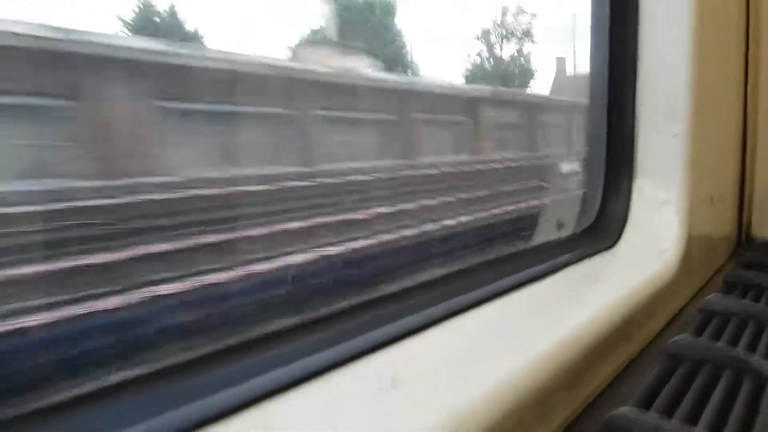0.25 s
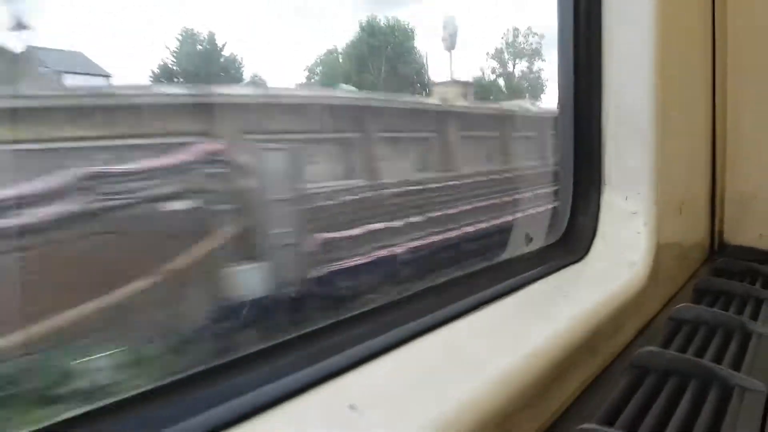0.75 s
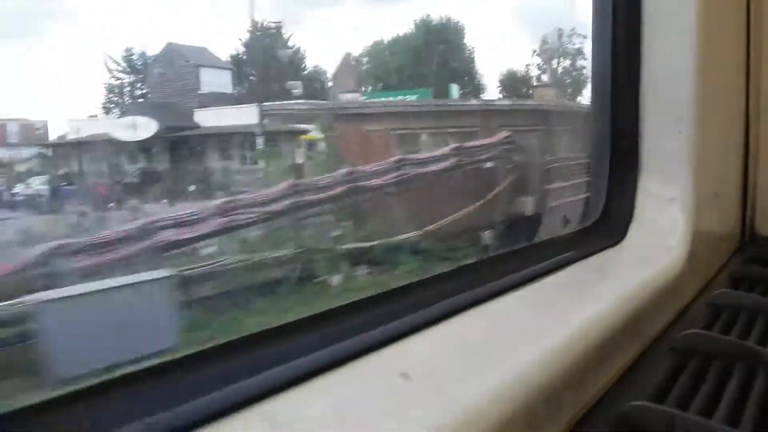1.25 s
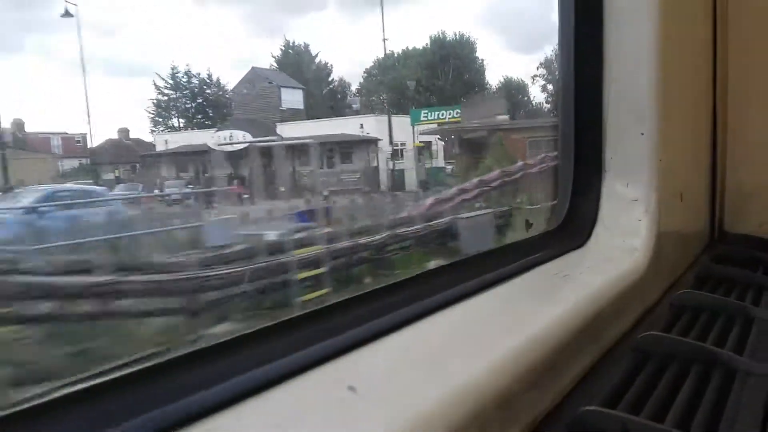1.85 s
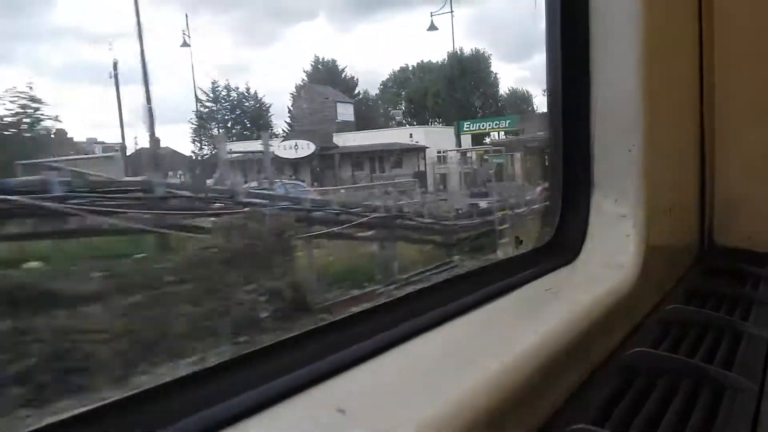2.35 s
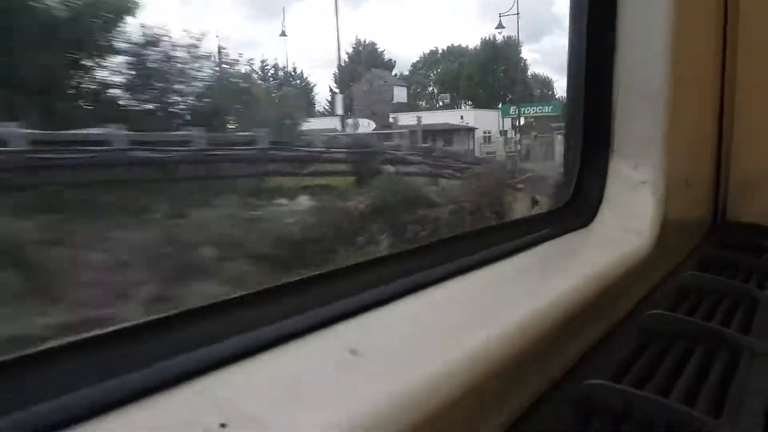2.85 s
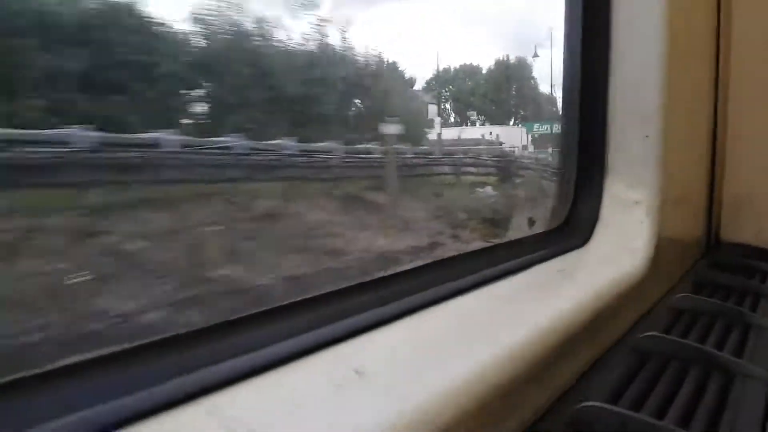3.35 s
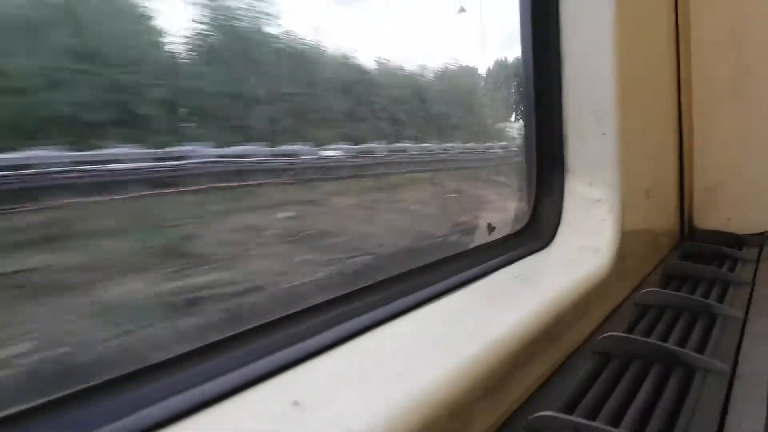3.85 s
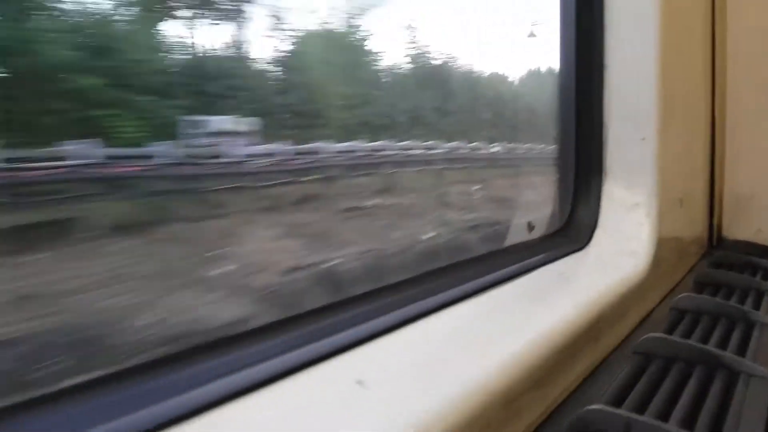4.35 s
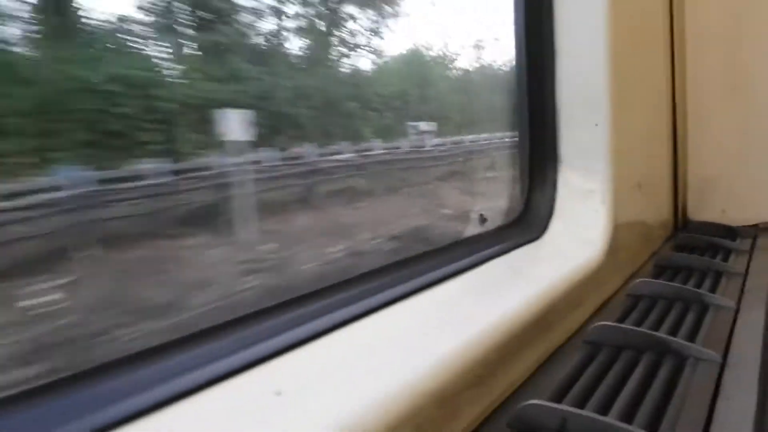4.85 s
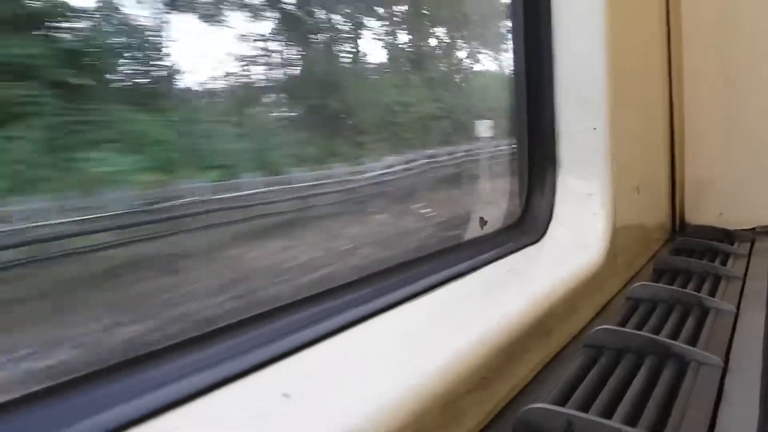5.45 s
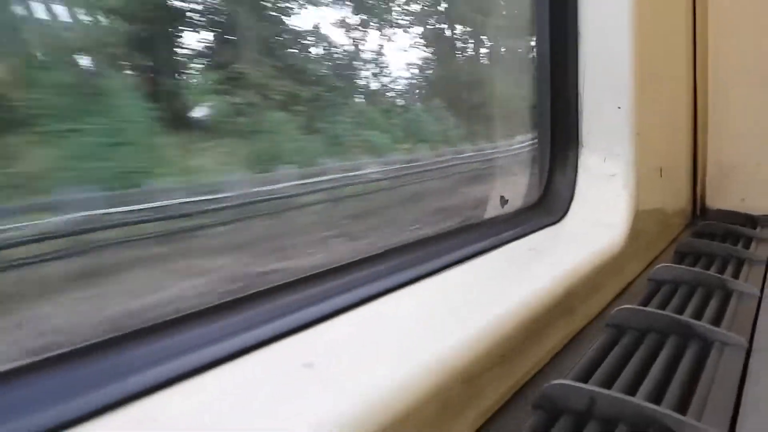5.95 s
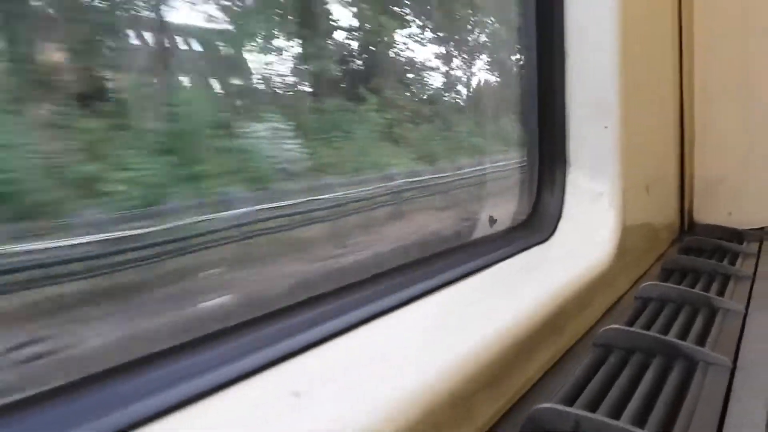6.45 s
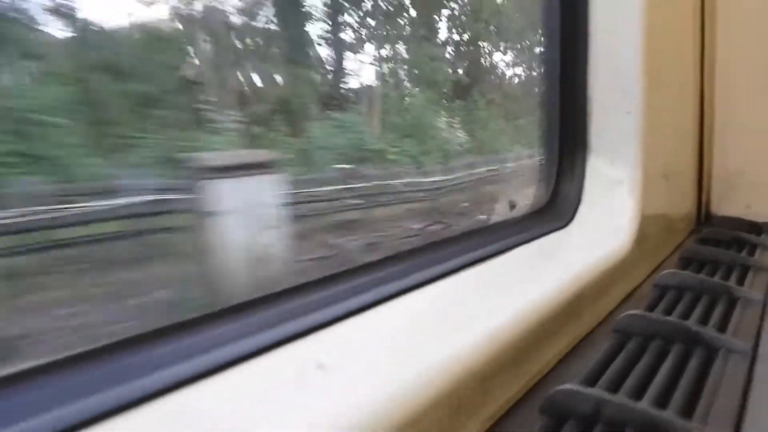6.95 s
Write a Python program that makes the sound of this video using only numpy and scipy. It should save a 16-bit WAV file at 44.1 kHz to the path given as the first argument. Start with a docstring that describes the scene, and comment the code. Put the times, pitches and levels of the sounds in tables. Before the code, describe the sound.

Interior of an underground train accelerating gently on open track, heard in stereo from a window seat. Throughout, deep rumble and wheel roar come through the floor, with muffled tread hiss, faintly ringing rims and gear and motor tones creeping upward. From 0.2 s, irregular thumps and loose clatter come several times a second, with brief flange rubs at 0.3-0.4 s and a faint low drone around 1.2-1.8 s. Between 2.2 and 3.5 s, dry shoe scrapes appear, sharpest near 2.6 s with a squeak and bright hiss; hard clacks fall around 2.9-3.0 s. From 4.0 to 5.2 s, strong low drones near 210 Hz pulse and beat with gritty grinding and heavier rumble. After 5.3 s it calms; a rough gearcase howl grows, turning cleaner after 6.4 s. Sharp clacks and a heavy thump land around 6.6-6.9 s, before the rolling sound continues to about 7.2 s.

```python
"""Underground train gathering speed

A carriage on open track, heard from a window seat. Motor and gears whine upward as harmonics of the shaft.
Shaped noise makes the rumble and roar through the floor and the hiss of the treads; the rims ring faintly.
Rail joints set off decaying panel modes, and stretches of rippled rail add beating drones.
Wheel flanges rub in gritty bands of noise; the current shoes scrape and squeak, and bright hiss bursts out."""
import sys
import numpy as np
from scipy import signal
from scipy.fft import rfft, irfft
from scipy.io import wavfile
from scipy.ndimage import uniform_filter1d, map_coordinates

SR = 44100
rng = np.random.default_rng(int(sys.argv[2]) if len(sys.argv) > 2 else 0)


def to_wav(s):
    """Save 16-bit WAV."""
    ch = np.atleast_2d(s).T  # columns
    pcm = np.round(np.clip(ch, -1, 1) * 32767)  # PCM
    wavfile.write(sys.argv[1], SR, pcm.astype(np.int16))


N = 317950
TIME = np.arange(N) / SR  # s
FREQ = np.arange(N // 2 + 1) * SR / N  # Hz


def undb(db):
    """Logarithmic level: decibels to amplitude gain."""
    return 10 ** (np.asarray(db) / 20)


def curves(table):
    """Linear interpolation: each column after the first as a line through time."""
    s, *columns = np.transpose(table)
    return [np.interp(TIME, s, column) for column in columns]


def colour(points):
    """Spectral envelope: levels in dB joined by straight lines on a log-frequency axis."""
    hz, db = np.transpose(points)
    return np.interp(np.log(FREQ + 1), np.log(hz), db)


def resonances(modes):
    """Resonance: the lift in dB that a set of modes gives, each a Lorentzian peak in power."""
    lift = 0
    for hz, width_hz, db in modes:
        peak = (undb(db) ** 2 - 1).clip(0)
        lift = lift + peak / (1 + (2 * (FREQ - hz) / width_hz) ** 2)
    return 10 * np.log10(1 + lift)


def unit(x):
    """Normalization: scale to rms 1."""
    return x / np.sqrt(np.mean(x ** 2))


def shape(x, db):
    """Linear filtering: weight the spectrum of x by a response in dB."""
    return irfft(rfft(x) * undb(db), N)


def noise(db):
    """Filtered noise: two unrelated channels (mid, side) with the given spectrum, rms 1."""
    return unit(shape(rng.standard_normal((2, N)), db))


def walk(rate):
    """Band-limited randomness: a smooth wander through `rate` random knots per second, rms 1."""
    knots = rng.standard_normal(4096)
    return unit(map_coordinates(knots, [TIME * rate], order=3, mode="wrap"))


def tone(hz, flutter_db, flutter_rate):
    """Multipath fading: a line whose strength flutters as its paths through the carriage shift; (mid, side)."""
    phase = 2 * np.pi * np.cumsum(hz) / SR
    channels = []
    for _ in range(2):
        strength = undb(flutter_db * np.tanh(walk(flutter_rate)))
        channels.append(strength * np.sin(phase + rng.uniform(0, 2 * np.pi)))
    return unit(np.array(channels))


def howl(hz, width_hz):
    """Quadrature modulation: a narrow band of noise riding on a pitch; (mid, side)."""
    phase = 2 * np.pi * np.cumsum(hz) / SR
    channels = [walk(width_hz) * np.sin(phase) + walk(width_hz) * np.cos(phase) for _ in range(2)]
    return unit(np.array(channels))


def swell(s, length):
    """Gaussian envelope: a smooth rise and fall around s, down to 1/e at `length` seconds either side."""
    return np.exp(-((TIME - s) / length) ** 2)


def swells(events):
    """Superposition: the summed gain of swells given as (middle, 1/e half-length, level in dB)."""
    return sum(undb(db) * swell(s, length) for s, length, db in events)


# Traction levels. Each row: time in seconds, gear mesh, motor whine and thin whistle in dB.
TRACTION_LEVELS = [(0, -45, -41, -74), (.5, -39, -51, -65.5), (1.1, -38.5, -52, -56),
                   (1.9, -38.5, -46.5, -56), (2.7, -36, -55.5, -65), (3.5, -33, -53, -58.5),
                   (4.8, -36, -59, -60.5), (5.6, -32.5, -50.5, -56), (6.3, -39.5, -49.5, -64),
                   (7.21, -36, -53, -63)]
# Gear tones. Each row: multiple of the shaft speed, relative level in dB before the frame resonance.
GEAR_PARTIALS = [(18, 0), (36.4, -15.5)]
# Motor whine tones. Each row: multiple of the shaft speed, relative level in dB.
WHINE_PARTIALS = [(51, -7), (64, 0)]
# Speed of the motor shaft. Each row: time in seconds, turns per second.
SHAFT_SPEED = [(0, 22.79), (1.15, 23.37), (5.3, 25.23), (6.0, 25.6), (7.21, 26.32)]
# Gearcase, rough at first, then settling on a clean note.
# Each row: time in seconds, rough howl and clean note in dB, both before the gearcase resonance.
GEARCASE_LEVELS = [(0, -52, -60), (3.6, -44, -49), (5.0, -41, -45), (5.5, -37.5, -47), (6.1, -36.5, -48),
                   (6.5, -40, -40.5), (7.21, -43.5, -36.5)]
WHISTLE_ORDER, CASE_ORDER = 192, 29.25  # multiples of the shaft speed


def traction():
    """Harmonic excitation: gear teeth and rotor slots sing at multiples of shaft speed; the gearcase howls."""
    gear_db, whine_db, whistle_db = curves(TRACTION_LEVELS)
    howl_db, note_db = curves(GEARCASE_LEVELS)
    shaft_hz = curves(SHAFT_SPEED)[0] * (1 + 0.0004 * walk(6))
    gear = sum(undb(db) * tone(order * shaft_hz, flutter_db=1.5, flutter_rate=8.6)
               for order, db in GEAR_PARTIALS)
    # the upper gear tone stands out while it passes a resonance of the bogie frame
    gear = shape(gear, resonances([(842, 8, 16)]))
    whine = sum(undb(db) * tone(order * shaft_hz, flutter_db=5.0, flutter_rate=10)
                for order, db in WHINE_PARTIALS)
    whistle = howl(WHISTLE_ORDER * shaft_hz, width_hz=24)
    # a rough tone with a clean core climbs into the fixed resonance of the gearcase
    case_hz = CASE_ORDER * shaft_hz
    rough = undb(howl_db) * howl(case_hz + 8, width_hz=80)
    clean = undb(note_db) * tone(case_hz, flutter_db=1, flutter_rate=12)
    case = shape(rough + clean, resonances([(765, 50, 5)]))
    return undb(gear_db) * gear + undb(whine_db) * whine + undb(whistle_db) * whistle + case


# Roughness of the track. Each row: time in seconds, then the driving levels in dB of the bogie boom,
# the floor rumble and the wheel roar, before each layer's own offset.
TRACK_ROUGHNESS = [(0.0, -25.5, -24, -27), (0.44, -34.5, -23.5, -28), (0.76, -31, -26.5, -29),
                   (0.98, -38.5, -31.5, -29), (1.65, -34, -27, -27), (2.55, -31, -34.5, -27.5),
                   (2.75, -29.5, -27, -26), (3.09, -40, -36.5, -28), (3.41, -25, -23.5, -26),
                   (3.73, -37.5, -32, -29.5), (4.18, -39.5, -21.5, -27), (4.84, -36.5, -38, -27.5),
                   (5.06, -36.5, -23.5, -27.5), (5.26, -33, -27.5, -28.5), (5.62, -37, -31.5, -32.5),
                   (6.57, -40, -37, -31.5), (6.77, -28, -28, -27.5), (7.21, -39.5, -28.5, -29)]
# Dips that rock the bogies.
# Each row: middle in seconds, 1/e half-length in seconds, boom in dB, rumble in dB.
TRACK_DIPS = [(0.095, 0.07, -37, -26.5), (0.556, 0.052, -26.5, -26), (1.608, 0.19, -46, -24.5),
              (2.168, 0.12, -26.5, -23), (2.761, 0.28, -28.5, -17.5), (3.357, 0.064, -27, -23.5),
              (4.028, 0.1, -29.5, -18), (4.482, 0.074, -40.5, -15), (4.641, 0.096, -44, -18.5),
              (4.997, 0.034, -37, -16), (5.167, 0.075, -25.5, -23.5), (5.399, 0.053, -24.5, -24),
              (5.865, 0.05, -27, -29), (5.985, 0.029, -30, -28.5), (6.138, 0.03, -33.5, -24.5),
              (6.279, .06, -30, -24.5), (6.582, 0.062, -31, -25.5), (6.804, 0.03, -30, -24.5),
              (6.985, .04, -34, -33)]
# Floor and wall panels. Each row: mode in Hz, width in Hz, lift in dB.
PANEL_MODES = [(59.3, 6.2, 8.5), (98.5, 9.8, 6.5), (142.3, 18, 10.5), (190.8, 22, 6), (234.2, 13, 5),
               (287.3, 27, 4.5), (369.5, 13, 1), (442, 39, 1.5)]
# Spectra before the panels: rocking bogies, floor rumble, wheel roar.
# Each row: frequency in Hz, relative level in dB per Hz.
BOOM_SPECTRUM = [(20, -61.5), (30, -25), (42, -8.5), (56, 1.5), (75, 6), (100, 8.5), (125, -3),
                 (200, -50.5)]
RUMBLE_SPECTRUM = [(50, -34), (90, -18.5), (120, -6), (150, -1), (220, 0.5), (270, -18.5), (400, -16.5),
                   (900, -71)]
ROAR_SPECTRUM = [(120, -15.5), (220, -3.5), (290, 1), (370, -1.5), (450, -4), (560, -5), (700, -4.5),
                 (840, -7.5), (1000, -14), (1300, -21), (2000, -28), (4000, -32.5), (9000, -61)]
BOOM_DB, RUMBLE_DB, ROAR_DB = 1, 1.5, 5  # offset of each layer from the track level that drives it


def rolling():
    """Forced vibration: rail roughness rocks bogies, shakes panels and roars below; dips add low surges."""
    boom_db, rumble_db, roar_db = curves(TRACK_ROUGHNESS)
    panels = resonances(PANEL_MODES)
    rock = swells((s, length, db) for s, length, db, _ in TRACK_DIPS)
    shake = swells((s, length, db) for s, length, _, db in TRACK_DIPS)
    # track and dips add in power
    boom_gain = np.hypot(undb(boom_db + BOOM_DB), rock)
    rumble_gain = np.hypot(undb(rumble_db + RUMBLE_DB + 1.5 * walk(20)), shake)
    roar_gain = undb(roar_db + ROAR_DB + 1.25 * walk(25))
    boom = boom_gain * noise(colour(BOOM_SPECTRUM) + panels)
    rumble = rumble_gain * noise(colour(RUMBLE_SPECTRUM) + panels)
    roar = roar_gain * noise(colour(ROAR_SPECTRUM) + panels)
    return boom + rumble + roar


# Steel tread grinding on the rail. Each row: frequency in Hz, relative level in dB per Hz.
GRIND_SPECTRUM = [(400, -0.5), (700, 2.5), (1000, 0), (1400, -5.5), (2200, -13), (2700, -29.5),
                  (4000, -23.5), (9000, -54)]


def grinding():
    """Rough contact: the gritty sound of a steel tread on the rail, as noise of flickering level."""
    return noise(colour(GRIND_SPECTRUM)) * undb(2.1 * walk(60))


# Wheel on rail. Each row: time in seconds, hiss in dB, rim singing in dB.
TREAD_LEVELS = [(0, -35.5, -56), (.4, -34.5, -51), (.8, -38.5, -55.5), (2.2, -39, -51), (3.3, -37.5, -48),
                (3.75, -39.5, -51.5), (4.6, -38, -68), (5.8, -39.5, -51), (6.2, -37, -46.5),
                (7.21, -37.5, -52.5)]
# Tread hiss before the rims colour it. Each row: frequency in Hz, relative level in dB per Hz.
HISS_SPECTRUM = [(600, -10), (1300, 9.5), (1900, 3), (2600, 1), (3600, 1.5), (4400, -0.5), (5100, -3.5),
                 (5600, -6.5), (6800, -14), (8000, -13.5), (9000, -56.5)]
# Rims that colour the hiss. Each row: mode in Hz, width in Hz, lift in dB.
RIM_MODES = [(2310, 180, 9.5), (3030, 220, 6.5), (3130, 180, 5.5), (3943, 78, 8), (4930, 200, 7)]
# Singing rims. Each row: tone in Hz, width in Hz, relative level in dB.
SINGING_TONES = [(2252, 50, -2), (2995, 20, -4), (3116, 45, -2), (3985, 38, -9)]
GRIND_DB = -11  # offset of the grinding from the roar level of the track


def wheels():
    """Modal response: treads hiss, and grind harder on rough track; the rims colour the hiss and sing."""
    hiss_db, sing_db = curves(TREAD_LEVELS)
    *_, roar_db = curves(TRACK_ROUGHNESS)
    hiss = noise(colour(HISS_SPECTRUM) + resonances(RIM_MODES)) * undb(hiss_db + 0.73 * walk(20))
    sing = sum(undb(db) * howl(np.full(N, hz), width_hz) for hz, width_hz, db in SINGING_TONES)
    return hiss + undb(roar_db + GRIND_DB) * grinding() + undb(sing_db) * sing


# Blows at the rail joints. Each row: start in seconds, thump in dB, clatter in dB before its envelope,
# contact frequency in Hz (higher for a brighter thump).
JOINT_BLOWS = [(.217, -13.5, -24.5, 176.5), (0.247, -23.5, -19.5, 230), (.374, -19.5, -17, 288),
               (.516, -20.5, -32, 194), (.650, -19.5, -21, 212), (.720, -20.5, -28.5, 258),
               (.912, -16.5, -35, 202), (1.244, -15.5, -16.5, 226), (1.385, -15, -21, 224),
               (1.494, -19.5, -37.5, 256), (1.656, -21, -31.5, 212), (1.804, -22, -23.5, 235),
               (1.946, -22.5, -32.5, 296), (2.063, -17, -25, 297), (2.160, -20.5, -18.5, 315),
               (2.296, -16, -16, 328), (2.512, -17.5, -24.5, 374), (2.629, -15, -28.5, 322),
               (2.764, -19, -28.5, 253), (2.853, -19.5, -13, 253), (2.886, -21, -16.5, 228),
               (2.993, -14, -13, 236), (3.066, -24, -19.5, 320), (3.315, -16.5, -25.5, 178),
               (3.445, -14.5, -31, 243), (3.979, -14, -23.5, 143), (4.005, -16, -24.5, 140),
               (4.033, -20, -16, 287), (4.171, -24.5, -16.5, 276), (4.320, -14, -28, 249),
               (4.394, -21.5, -26, 442), (4.433, -15, -19.5, 282), (4.782, -16.5, -15, 455),
               (4.858, -16, -18, 213), (4.989, -15, -17, 159), (5.108, -27.5, -19.5, 247),
               (5.151, -23.5, -20, 410), (5.366, -25, -33.5, 173.5), (5.493, -21.5, -36, 159),
               (5.811, -20, -24, 149.5), (6.105, -22.5, -21, 151), (6.237, -32.5, -14.5, 263),
               (6.629, -28, -16, 318), (6.752, -18, -13, 167), (6.781, -33.5, -20, 280),
               (6.875, -12.5, -23.5, 206), (6.989, -15.5, -29, 273), (7.118, -19.5, -21.5, 197)]
# Loose bogie parts. Each row: frequency in Hz, relative level in dB per Hz.
CLATTER_SPECTRUM = [(150, -8.5), (300, 8.5), (500, 5), (800, 0), (1100, -11.5), (2000, -17), (4000, -26.5),
                    (9000, -53.5)]


def rail_joints(rise_s=0.0066, ring=0.65, contact_q=2.1, clatter_s=0.032, clack_db=-9, clack_s=0.011):
    """Impact excitation: a steel clack rings the panels in decaying modes; loose bogie parts clatter."""
    t = TIME[:SR // 3]
    thumps, clatter_gain, clack_gain = np.zeros((2, N + SR)), np.zeros(N + SR), np.zeros(N + SR)
    hz, width_hz, mode_db = np.transpose(PANEL_MODES)[:, :, None]
    attack = 1 - np.exp(-t / rise_s)
    decay = np.exp(-np.pi * ring * width_hz * t)
    for s, thump_db, clatter_db, contact_hz in JOINT_BLOWS:
        start = int(s * SR)
        at = slice(start, start + len(t))
        # the suspension passes the blow best near its contact frequency
        mismatch = contact_q * (hz / contact_hz - contact_hz / hz)
        weight = undb(mode_db) * width_hz / (1 + mismatch ** 2)
        phase = rng.uniform(0, 2 * np.pi, (2, len(hz), 1))
        detune = 1 + 0.033 * rng.standard_normal((len(hz), 1))
        modes = weight * decay * np.sin(2 * np.pi * hz * detune * t + phase)
        thump = attack * np.sum(modes, axis=1)
        # the thump level is that of its first 1/30 s
        thumps[:, at] += undb(thump_db) * thump / thump[:, :SR // 30].std(axis=1, keepdims=True)
        clatter_gain[at] += undb(clatter_db) * attack * np.exp(-t / clatter_s)
        clack_gain[at] += undb(clatter_db + clack_db) * np.minimum(t / 0.0012, 1) * np.exp(-t / clack_s)
    clatter = clatter_gain[:N] * noise(colour(CLATTER_SPECTRUM))
    return thumps[:, :N] + clatter + clack_gain[:N] * grinding()


# Stretches of rippled rail. Each row: start in seconds, length in seconds, pitch in Hz, drone in dB,
# neighbouring wheels in dB against the central tone, rms pitch scatter as a fraction,
# octave in dB, grinding in dB.
RIPPLED_STRETCHES = [(.23, .052, 222, -21, -6, .03, -44, -47), (.51, .2, 214, -23, -3, .03, -34, -52.5),
                     (.88, .083, 199, -26.5, -6, .03, -41, -46.5),
                     (1.23, .53, 222, -24.5, -6, .03, -36.5, -51.5),
                     (1.97, .16, 294, -24, -9, .03, -42, -45.5), (2.51, .42, 305, -24, -5, .08, -42, -52),
                     (4.04, .07, 285, -21, -6, .03, -40, -45), (4.125, .06, 207, -11.5, -7, .015, -29, -45),
                     (4.2, .22, 214, -13.2, 1, .015, -27.5, -36), (4.67, .1, 215, -13, -11, .015, -25, -51),
                     (4.81, .15, 213, -10.3, -7, .02, -28.5, -37),
                     (4.98, .14, 215, -11.3, -4.5, .022, -29.5, -44)]
RIPPLE_ATTACK_S, RIPPLE_RELEASE_S = .018, .038


def rippled_rail(rattle_db=-2):
    """Periodic excitation and beats: even ripples drone with an octave, rattle the floor and grind treads."""
    pitch, beat, scatter = np.full(N, 1. * RIPPLED_STRETCHES[0][2]), np.zeros(N), np.zeros(N)
    drone_gain, octave_gain, grind_gain = 0, 0, 0
    for s, length, hz, drone_db, beat_db, spread, octave_db, grind_db in RIPPLED_STRETCHES:
        rise = np.clip((TIME - s) / RIPPLE_ATTACK_S + .5, 0, 1)
        on = rise * np.exp(-np.maximum(TIME - s - length, 0) / RIPPLE_RELEASE_S)
        drone_gain = np.maximum(drone_gain, on * undb(drone_db))
        octave_gain = np.maximum(octave_gain, on * undb(octave_db))
        # the grinding dies twice as fast as the drone
        grind_gain = np.maximum(grind_gain, on ** 2 * undb(grind_db))
        pitch[on > 0], beat[on > 0], scatter[on > 0] = hz, undb(beat_db), spread
    beat = uniform_filter1d(beat, size=800)
    # the ripple spacing differs a little from wheel to wheel, so their tones beat
    low, centre, high = (tone(pitch * ratio * (1 + scatter * walk(45)), flutter_db=1, flutter_rate=30)
                         for ratio in (.915, 1, 1.08))
    drone = (centre + beat * (low + high)) / np.sqrt(1 + 2 * beat ** 2)
    octave = howl(2.06 * pitch, width_hz=55)
    # the rattle grows with the square of the drone, so only deep ripples bring it out
    rattle_gain = drone_gain ** 2 * undb(rattle_db)
    rattle = rattle_gain * noise(colour(ROAR_SPECTRUM) + resonances(PANEL_MODES))
    return drone_gain * drone + grind_gain * grinding() + octave_gain * octave + rattle


# Flange rubs. Each row: middle in seconds, 1/e half-length in seconds, centre in Hz, width in Hz,
# glide in Hz per second, level in dB before the grit.
FLANGE_RUBS = [(.269, .039, 780, 400, 0, -30), (.405, .05, 800, 450, 0, -32),
               (2.575, .05, 1700, 1400, 0, -35), (4.26, .1, 1800, 1200, -1200, -37),
               (4.42, .1, 1400, 900, -1500, -36.5), (4.899, .06, 930, 600, 0, -32),
               (5.153, .055, 590, 260, 0, -25), (6.14, .04, 2280, 260, 0, -40),
               (6.769, .019, 1480, 1280, 0, -33)]


def flanges(grit_db=2.0):
    """Sliding friction: a flange rubs the side of the rail, a harsh band that sinks in the longer rubs."""
    rubs = np.zeros((2, N))
    for s, length, hz, width_hz, glide, db in FLANGE_RUBS:
        rubs += undb(db) * swell(s, length) * howl(hz + glide * (TIME - s), width_hz)
    return rubs * undb(grit_db * walk(110))


# Shoe scrapes. Each row: middle in seconds, 1/e half-length in seconds, level in dB before the grit.
SHOE_SCRAPES = [(2.208, 0.11, -33.5), (2.355, 0.028, -33), (2.559, 0.028, -26.5), (2.601, 0.029, -28),
                (2.684, 0.1, -33), (2.91, 0.048, -35), (2.997, 0.15, -35.5), (3.182, 0.021, -36),
                (3.404, 0.029, -35), (3.503, 0.11, -36.5), (4.035, 0.077, -33.5), (4.524, 0.1, -33)]
# Shoe rasp. Each row: frequency in Hz, relative level in dB per Hz.
SCRAPE_SPECTRUM = [(600, 13), (1300, 9), (2400, 3.5), (4200, 4.5), (5200, 0.5), (6500, -13.5), (8500, -17),
                   (10000, -51)]
# Shoe squeaks. Each row: middle in seconds, 1/e half-length in seconds, pitch at the middle in Hz,
# glide in Hz per second, level in dB, rms pitch scatter in Hz.
SHOE_SQUEAKS = [(2.573, 0.043, 2390, 2, -37, 120.6), (3.179, 0.028, 2950, -5000, -37, 130.3),
                (3.182, 0.022, 4400, -3000, -40, 161), (3.4, 0.018, 3340, -3, -34, 55.6),
                (4.53, 0.038, 3350, 10, -41, 151.5), (4.764, 0.022, 3620, -2000, -42.5, 110),
                (6.473, 0.012, 2910, -3000, -49, 60)]


def shoes():
    """Stick-slip friction: current shoes rasp on the live rail and squeak briefly at unsteady pitch."""
    rasp = swells(SHOE_SCRAPES) * noise(colour(SCRAPE_SPECTRUM)) * undb(.7 * walk(190))
    # phase wander for each Hz of pitch scatter
    slip = 2 * np.pi * np.cumsum([walk(400) for _ in range(2)], axis=1) / SR
    squeaks = np.zeros((2, N))
    for s, length, hz, glide, db, scatter_hz in SHOE_SQUEAKS:
        t = TIME - s
        phase = 2 * np.pi * (hz + glide * t / 2) * t + scatter_hz * slip
        squeaks += undb(db) * swell(s, length) * np.sqrt(2) * np.sin(phase)
    return squeaks + rasp


# Bright bursts. Each row: middle in seconds, 1/e half-length in seconds, level in dB before the flicker.
BRIGHT_BURSTS = [(2.585, 0.047, -42.5), (3.033, 0.017, -48), (3.194, 0.024, -55), (5.053, 0.029, -47.5)]
# Burst colour. Each row: frequency in Hz, relative level in dB per Hz.
BURST_SPECTRUM = [(2000, -9), (5000, 2), (7500, -3.5), (9500, -7.5), (12000, -13)]


def bright_bursts():
    """Amplitude-modulated noise: brief bright bursts of flickering hiss."""
    return swells(BRIGHT_BURSTS) * noise(colour(BURST_SPECTRUM)) * undb(2.2 * walk(400))


# Stereo width at the seat. Each row: frequency in Hz, side minus mid in dB.
SIDE_OVER_MID = [(60, -12), (110, -28.5), (190, -15.5), (310, -14), (550, -2), (950, -4), (1650, 1.5),
                 (8000, -1.5)]
# Stereo balance at the seat. Each row: frequency in Hz, left minus right in dB.
LEFT_OVER_RIGHT = [(60, -1.5), (180, -0.5), (310, 2), (550, 1), (780, -3), (1650, -2.5), (2300, -2.5),
                   (2900, -5), (3700, -7), (4500, -10.5), (5300, -10.5), (6000, -3.5), (6700, -1.5),
                   (8200, 17.5)]


def scene():
    """Diffuse-field coherence: bass reaches both sides alike, while treble comes from all around."""
    layers = [traction(), rolling(), wheels(), rail_joints(), rippled_rail(), flanges(), shoes(),
              bright_bursts()]
    fade = np.clip(np.minimum(TIME, TIME[-1] - TIME) / .004, 0, 1)
    mid, side = rfft(fade * sum(layers))
    width, lean = undb(colour(SIDE_OVER_MID)), undb(colour(LEFT_OVER_RIGHT))
    ears = np.array([(mid + width * side) * lean, mid - width * side])
    # width and lean leave the total power unchanged
    return irfft(ears * np.sqrt(2 / (1 + width ** 2) / (1 + lean ** 2)), N)


LOW_CUT_HZ, TOP_HZ = 37, 9150


def record(dry):
    """Saturation and band limiting: the highest peaks are rounded, the lowest bass and the top cut."""
    rounded = dry / (1 + dry ** 6) ** (1 / 6)
    low_cut = FREQ ** 4 / np.sqrt(FREQ ** 8 + LOW_CUT_HZ ** 8)
    trimmed = irfft(rfft(rounded) * low_cut, N)
    top_cut = signal.ellip(8, .2, 70, TOP_HZ, fs=SR, output="sos")
    return signal.sosfilt(top_cut, trimmed)


dry = scene()
out = record(dry)
to_wav(out)
```